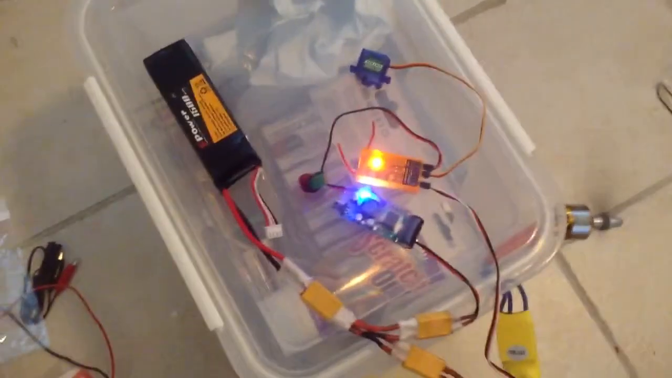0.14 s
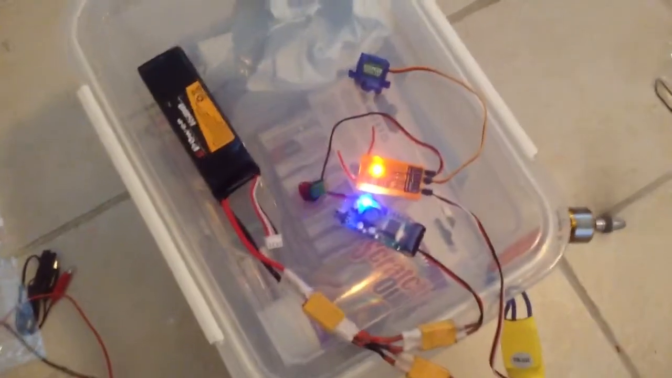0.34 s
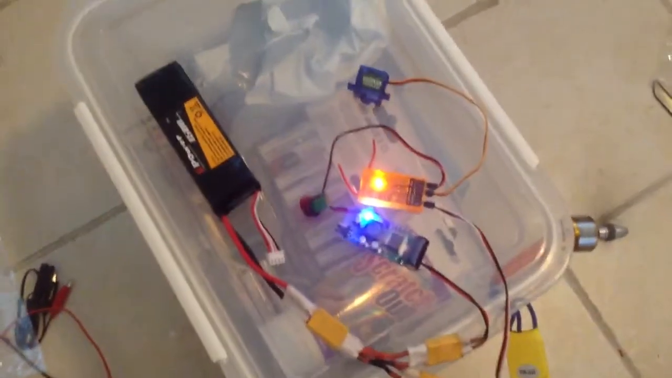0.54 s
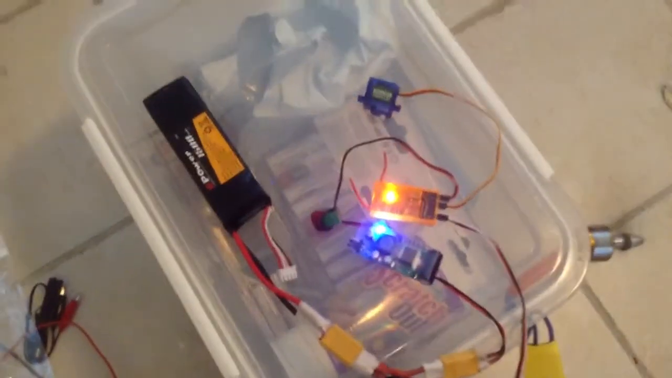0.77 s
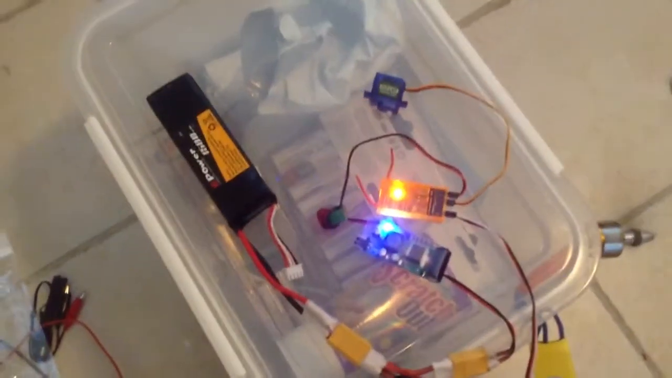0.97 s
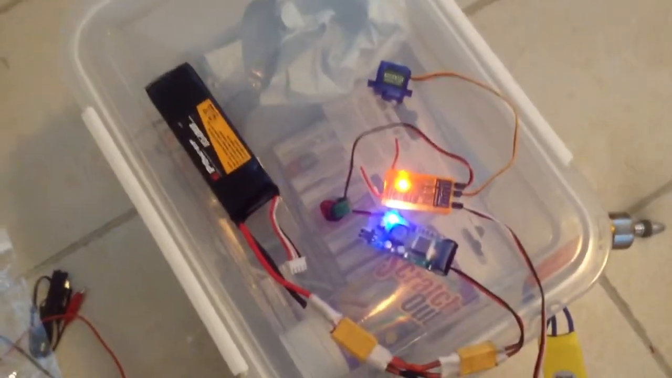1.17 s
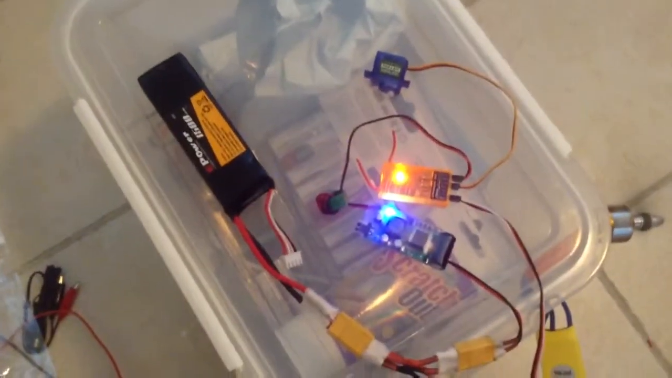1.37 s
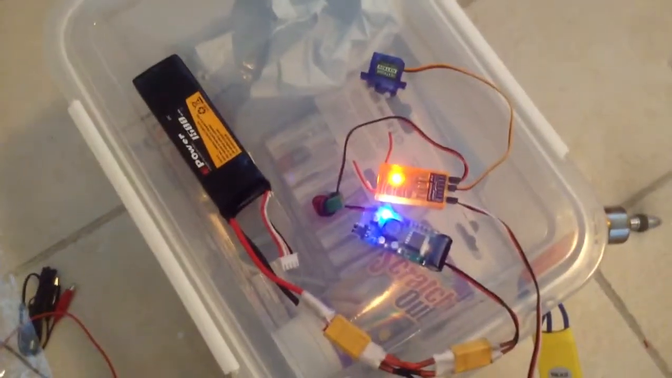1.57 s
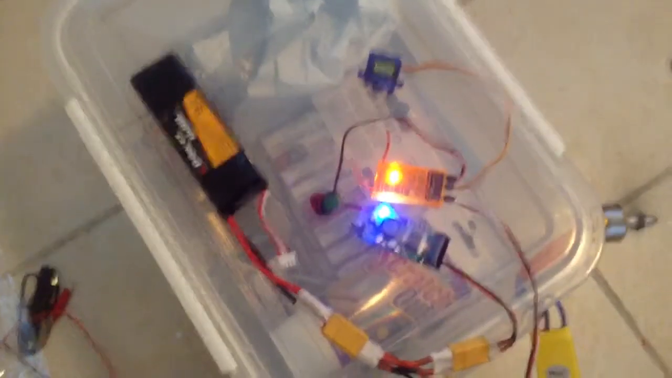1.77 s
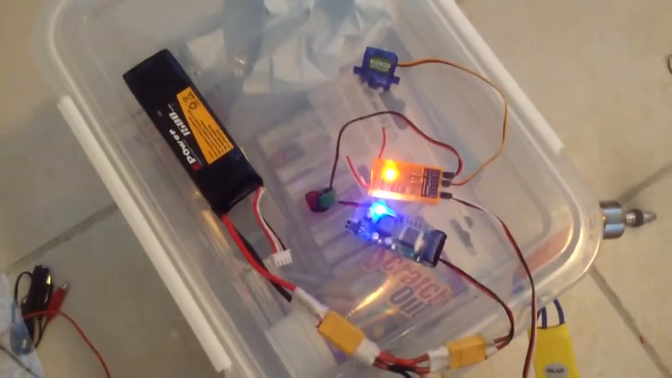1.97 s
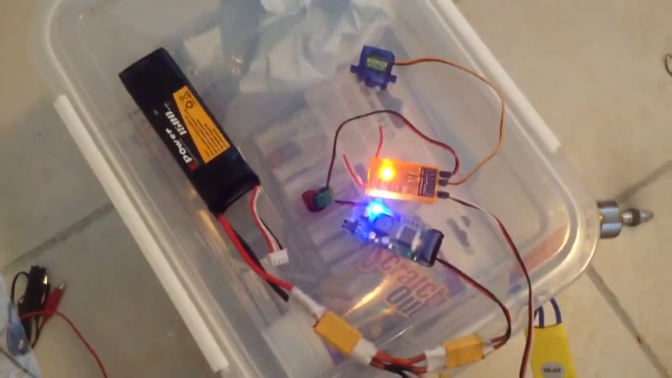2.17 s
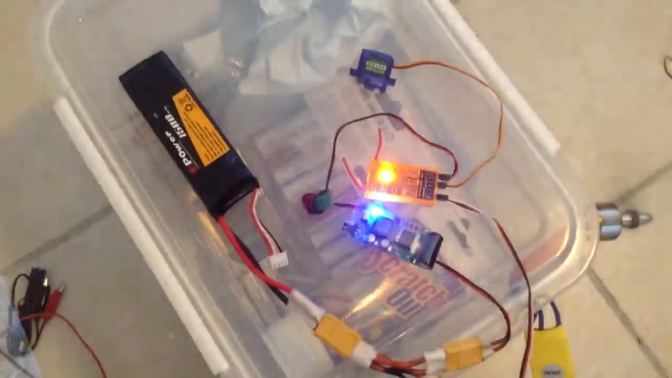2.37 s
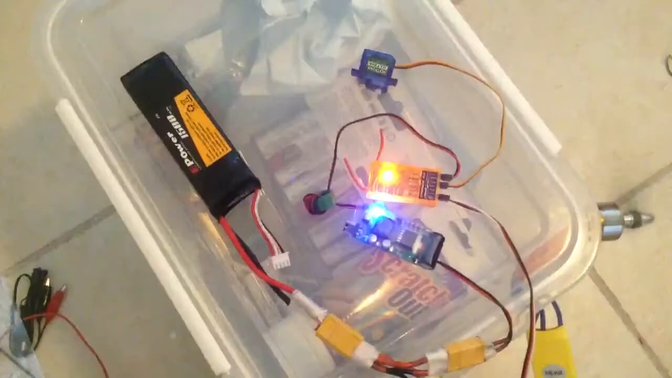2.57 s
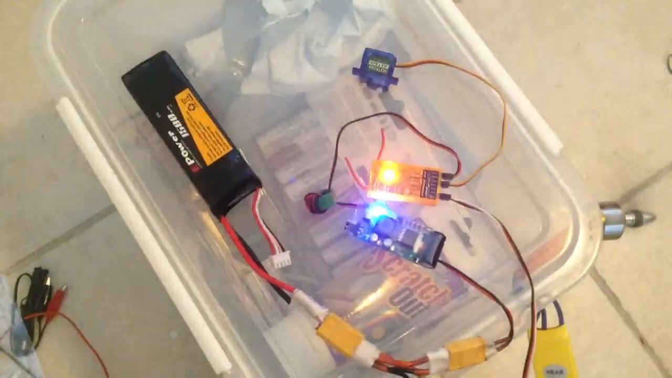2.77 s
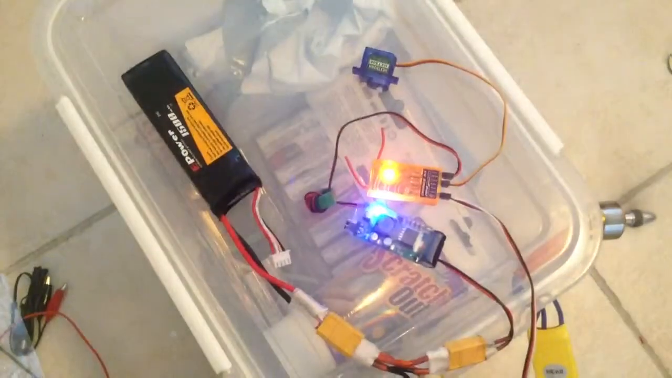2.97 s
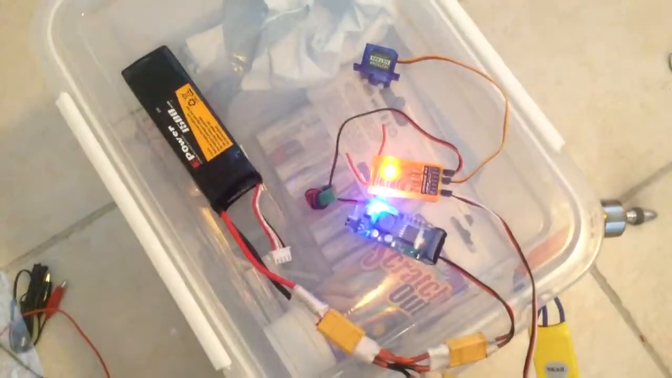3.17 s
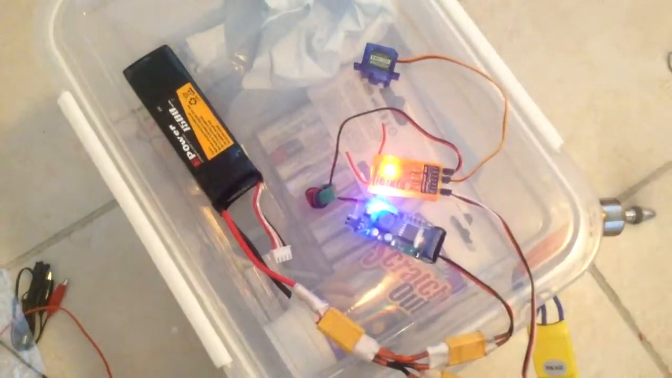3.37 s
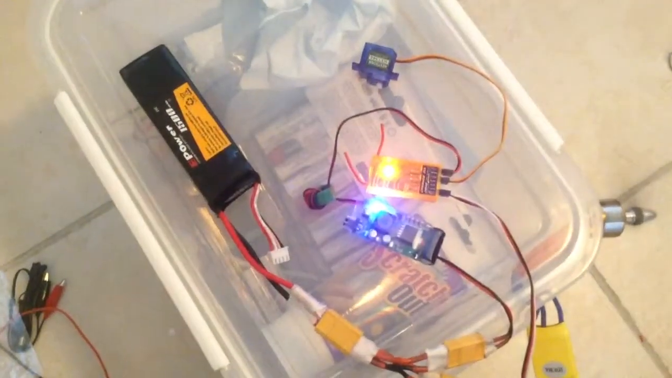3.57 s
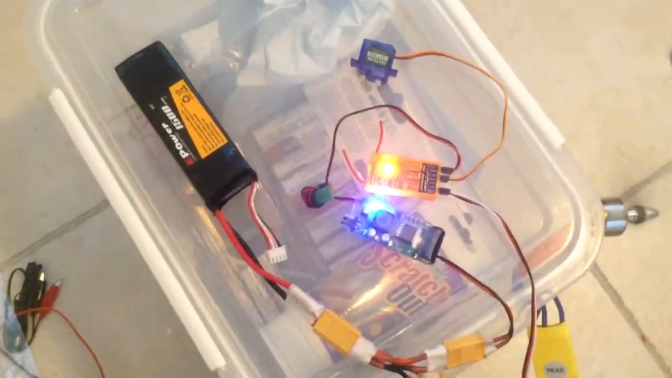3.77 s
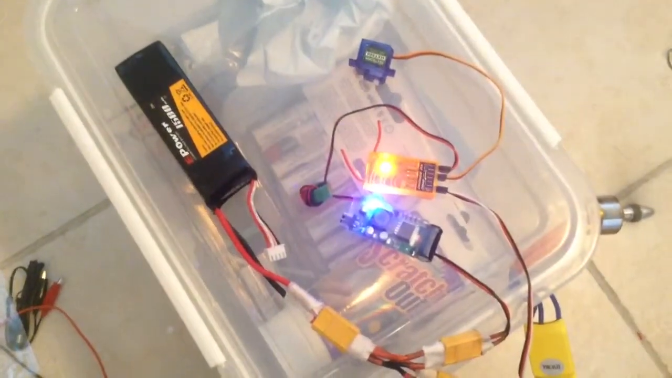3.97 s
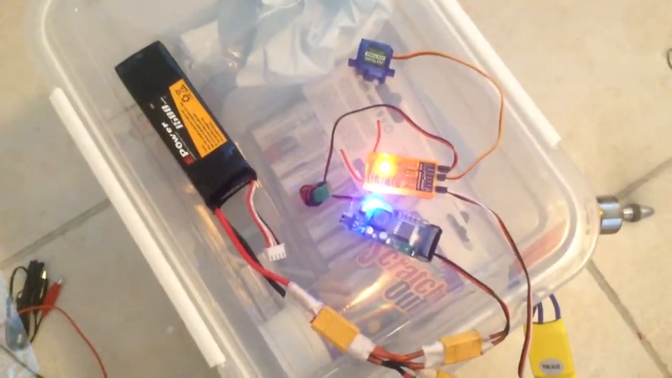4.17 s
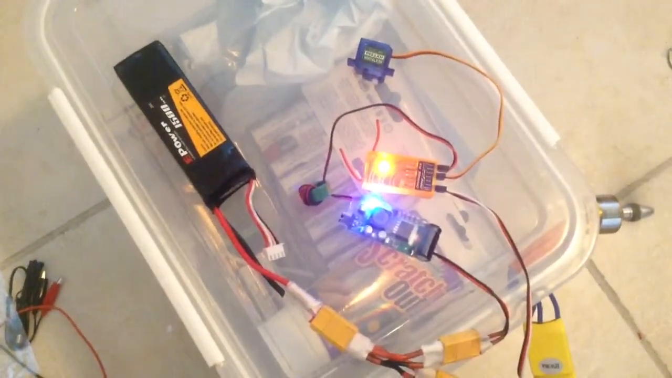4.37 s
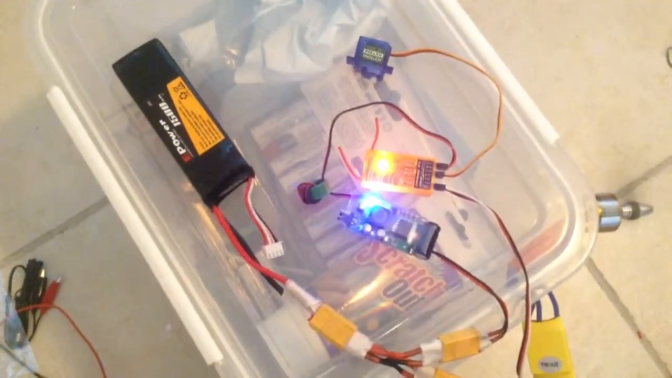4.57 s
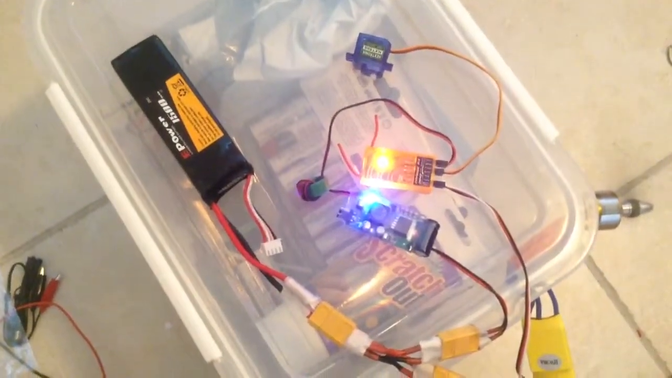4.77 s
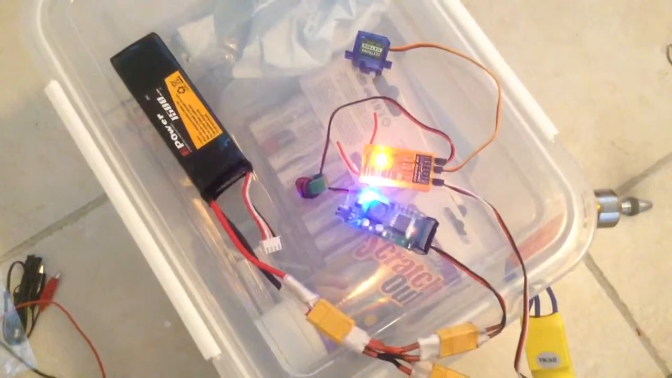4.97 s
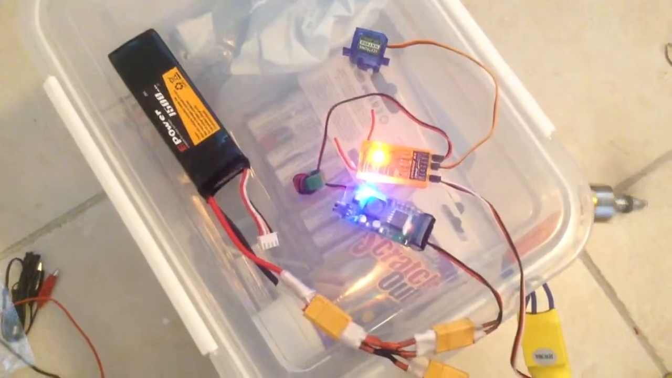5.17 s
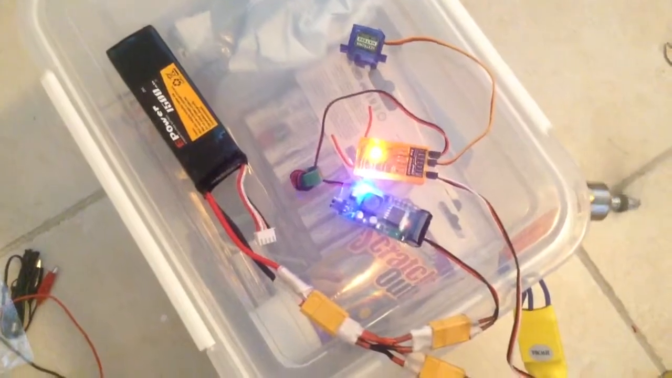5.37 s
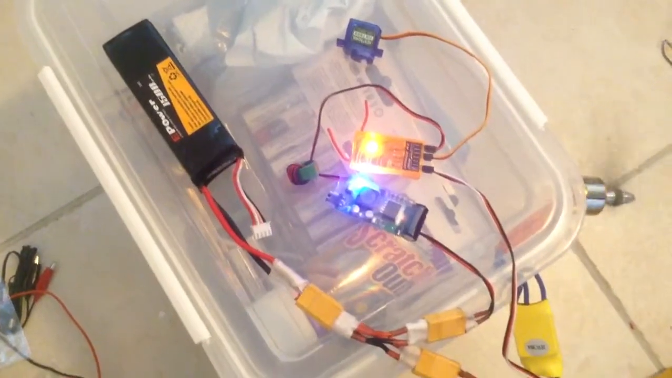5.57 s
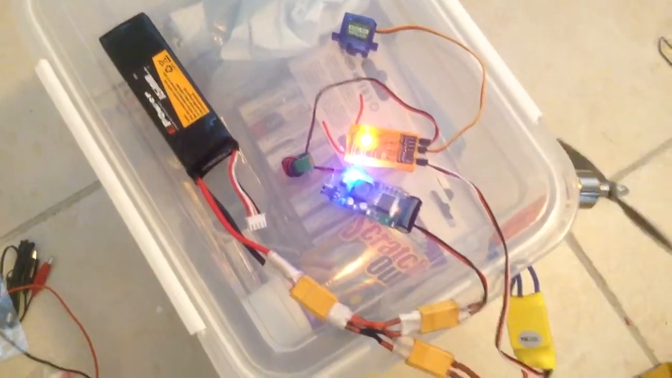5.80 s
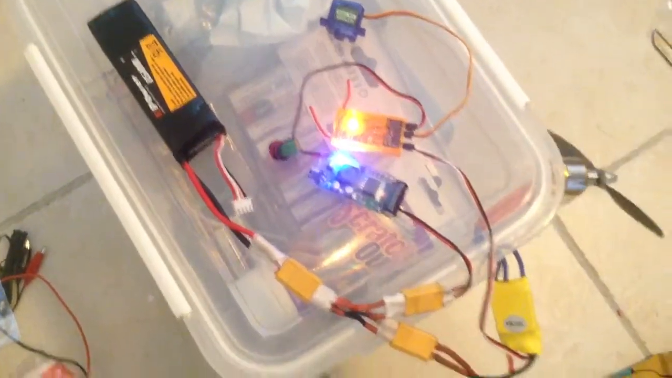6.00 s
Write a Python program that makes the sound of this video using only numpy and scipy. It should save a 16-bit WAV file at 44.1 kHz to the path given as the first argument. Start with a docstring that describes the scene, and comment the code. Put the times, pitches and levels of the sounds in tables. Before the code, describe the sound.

A small brushless motor spins a two-blade propeller close to the microphone: a piercing, slightly wavering whistle, fainter high whines, low hum and a fluttering rush of air. An early bright rasp ends at one sharp, loud knock with brief scuffs, followed by weaker taps. Near the end the power cuts, the whine vanishes and the rotor quickly slows with soft boomy shakes, leaving a quiet tiled room.

```python
"""Small propeller motor, powered and then coasting down

A small brushless motor on a plastic box spins a two-blade propeller on a tiled floor, close to a microphone.
Its drive whines and whistles (wavering sines) over a low hum and a rush of air (shaped noise that the blades chop).
An early rasp of pulsing noise dies away just after a sharp knock; there are also weaker knocks and scuffs.
Then the power is cut: the rotor coasts down, shaking the box, and a faint thin whistle rises in the quiet."""
import sys
import numpy as np
from scipy import signal
from scipy.fft import rfft, irfft
from scipy.io import wavfile
from scipy.ndimage import map_coordinates

SR = 44100
rng = np.random.default_rng(int(sys.argv[2]) if len(sys.argv) > 2 else 0)


def dump(signal):
    """Clip the signal to [-1, 1] and save it as 16-bit WAV at the path in sys.argv[1]."""
    limited = np.clip(np.atleast_2d(signal).T, -1, 1)
    pcm = np.round(limited * 32767).astype(np.int16)
    wavfile.write(sys.argv[1], SR, pcm)


N = 266344
T = np.arange(N) / SR  # time of every sample, s
HZ = np.fft.rfftfreq(N, 1 / SR)  # frequency of every bin of a full-length spectrum
SHAFT_HZ = 51.288  # turns per second at full speed
CUT_S = 5.155  # when the power is cut


def amp(db):
    """Turns decibels into a gain."""
    return 10 ** (np.asarray(db) / 20)


def unit(x):
    """Scales a signal to rms 1."""
    return x / np.sqrt(np.mean(abs(x) ** 2) + 1e-20)


def curve(rows):
    """Joins rows of (seconds, values..) by straight lines: one curve over time per value column."""
    seconds, *columns = np.transpose(rows)
    return [np.interp(T, seconds, column) for column in columns]


def read(points, hz):
    """Reads a spectrum of (Hz, value) points at any frequency, along a log-frequency axis."""
    point_hz, values = np.transpose(points)
    return np.interp(np.log(hz + 1), np.log(point_hz), values)


def noise(db):
    """Makes noise of rms 1 with the given spectrum in dB."""
    return unit(irfft(rfft(rng.standard_normal(N)) * amp(db), N))


def drift(rate_hz):
    """Makes a random wander of rms 1 that holds little movement faster than the given rate."""
    return unit(irfft(rfft(rng.standard_normal(N)) * np.exp(-(HZ / rate_hz) ** 2), N))


def tone(turns):
    """Makes a sine of rms 1 from a count of cycles, starting anywhere in its cycle."""
    return np.sqrt(2) * np.sin(2 * np.pi * (turns + rng.random()))


def lines(table, turns, waver_db, carrier=0, wander=0):
    """Adds sines at whole multiples of the shaft rate around a carrier, each wavering by itself."""
    total = 0
    for multiple, db in table:
        level = amp(db + waver_db * drift(3.4))
        cycles = carrier + round(multiple) * turns + wander * drift(5.1)
        total = total + level * tone(cycles)
    return total


def room():
    """The quiet room: steady noise, strongest in the low range."""
    # Shape of the room noise. Each row: frequency in Hz, relative level in dB.
    room_shape = [(18, -55), (30, -30), (119, -13), (185, 0.5), (281, -3), (346, -8), (511, -12),
                  (1000, -10.5), (1170, -13.5), (1690, -16.5), (2920, -16), (7830, -18), (9390, -18.5),
                  (15000, -18.5)]
    return amp(-68) * noise(read(room_shape, HZ))


def scuffs():
    """Short rubs and swishes, dull or hissy: bands of noise that swell and fade."""
    # Each row: middle in seconds, half length in seconds, centre in Hz, width in octaves, level in dB.
    rubs = [(.686, .013, 450, .7, -50), (.733, .012, 500, .9, -47), (.768, .02, 450, .9, -51),
            (.75, .012, 11000, .5, -50), (.773, .012, 11500, .45, -52), (.851, .018, 11500, .28, -55),
            (5.99, .04, 2200, .9, -75)]
    octaves = np.log2(HZ + 1)
    out = np.zeros(N)
    for middle_s, half_s, centre_hz, width, db in rubs:
        swell = np.exp(-((T - middle_s) / half_s) ** 2)
        distance = (octaves - np.log2(centre_hz)) / width
        out += amp(db) * swell * noise(-np.minimum(4 * distance ** 2, 100))
    return out


def knocks(turn_hz=170, size=4096):
    """Dead blows close to the microphone: a crack, then a short low push of opposite sign."""
    # The blows. Each row: start in seconds, peak in dB, treble tilt in dB per octave.
    blows = [(.681, -48, -4), (.7401, -4.3, 0), (.7812, -26, .8), (1.044, -53, -4), (1.275, -47, -1),
             (1.353, -47, -3), (1.378, -44, -4), (1.398, -48, -3), (1.546, -46, -4), (1.595, -45, -5)]
    # Spectrum that all blows share before their tilt. Each row: frequency in Hz, relative level in dB.
    blow_shape = [(30, -25), (85, -21), (140, -4), (215, 5), (330, 1), (620, -1.5), (1000, -8.5),
                  (1500, -16), (2200, -13.5), (3300, -23.5), (4600, -17.5), (6000, -37), (10000, -35.5),
                  (15000, -53.5)]
    hz = np.fft.fftfreq(size, 1 / SR)
    lag = (turn_hz - 1j * hz) / (turn_hz + 1j * hz)  # the bass arrives behind the crack
    out = np.zeros(N)
    for start_s, peak_db, tilt_db in blows:
        shape_db = read(blow_shape, abs(hz)) + tilt_db * np.log2(1 + abs(hz) / 250)
        log_gain = np.log(amp(shape_db))
        response = np.exp(np.conj(signal.hilbert(log_gain)))  # makes the ring follow the hit, never lead it
        blow = np.fft.ifft(lag * response).real
        out[round(start_s * SR):][:size] += amp(peak_db) * blow / abs(blow).max()
    return out


def thin_whistle():
    """A faint, nearly pure tone that rises in pitch and fades."""
    # Path of the tone. Each row: time in seconds, pitch in Hz, level in dB.
    path = [(5.55, 850, -92), (5.595, 965, -70), (5.64, 990, -79), (5.7, 1110, -79), (5.77, 1170, -72),
            (5.81, 1180, -81), (5.87, 1180, -81), (5.95, 1170, -92)]
    hz, db = curve(path)
    cycles = np.cumsum(hz) / SR + .12 * drift(45)
    sounding = (T > path[0][0]) * (T < path[-1][0])
    return amp(db + 2 * drift(25)) * tone(cycles) * sounding


def coast():
    """Share of full speed: steady until the cut, then slowed by drag (speed squared) and constant friction."""
    drag, friction = 3.75, .72  # share of full speed lost per second: to air at full speed, to friction
    balance = np.sqrt(friction / drag)  # the speed at which both brake equally
    angle = np.arctan(1 / balance) - drag * balance * np.maximum(T - CUT_S, 0)
    return balance * np.tan(np.maximum(angle, 0))


def coasting(turns, speed, box_hz=190, flutter_db=3, smear=0.18):
    """Magnetic cogging glides down unevenly while the shaken box booms in pulses at its own resonance."""
    # Jolts of the box. Each row: middle in seconds, half length in seconds, level in dB.
    jolts = [(5.19, .02, -62), (5.307, .018, -61), (5.384, 0.033, -65), (5.545, 0.042, -64),
             (5.694, 0.023, -62), (5.792, 0.034, -69.5)]
    cogs = 42  # magnetic catches per turn
    best_hz, best_db, fall_db = 770, -68, 6  # loudest pitch, its level, fall per squared octave from it
    octaves = np.log2(cogs * SHAFT_HZ * (speed + 1e-6) / best_hz)
    cogging_level = amp(best_db - fall_db * octaves ** 2 + flutter_db * drift(30))
    cogging = cogging_level * tone(cogs * turns + smear * drift(50))
    shake = sum(amp(db) * np.exp(-((T - middle_s) / half_s) ** 2) for middle_s, half_s, db in jolts)
    boom = shake * tone(box_hz * T + 0.16 * drift(35))
    return (cogging + boom) * (T > CUT_S)


def rasp(turns):
    """A bright rasp: noise that pulses twice a turn, holds until just after the sharp knock, then dies."""
    # Colour of the rasp. Each row: frequency in Hz, relative level in dB.
    rasp_shape = [(150, -54.5), (600, -17), (1200, -7), (1800, -3.5), (2200, 3), (2700, 3.5), (3350, -1),
                  (3800, 1), (4600, 2.5), (5200, 2), (5900, -18.5), (9000, -47.5)]
    hold_db, end_s, fall_db_per_s = -44, .755, 130.5
    level_db = hold_db - fall_db_per_s * np.maximum(T - end_s, 0)
    pulse = 1 + 0.16 * np.cos(4 * np.pi * turns)
    return noise(read(rasp_shape, HZ)) * amp(level_db) * pulse


def bearing(turns, size=860):
    """The same rough track passes on every turn: white noise that repeats at the shaft rate."""
    track = rng.standard_normal(size)
    return unit(map_coordinates(track, [turns % 1 * size], mode="grid-wrap"))


def air(turns, speed):
    """Turbulence chopped by two blades, with bearing roughness; as the rotor slows, the treble dies first."""
    # Broad shape of the rush. Each row: frequency in Hz, relative level in dB.
    rush_shape = [(50, -39.5), (110, -22.5), (190, -10.5), (420, -10.5), (490, -1.5), (780, -1.5),
                  (1000, -7), (1300, -3), (4000, -4), (5600, 0.5), (7000, -5.5), (9300, -7.5), (11300, -15),
                  (15300, -18)]
    # Bumps and dips that the box and floor give it. Each row: centre in Hz, width in Hz, change in dB.
    bumps = [(480, 14, 6), (516, 15, -5), (559, 13, 4), (750, 16, 3.5), (1683, 78, -3), (2090, 58, 1.5),
             (2685, 58, 5), (2940, 85, 3), (3060, 54, -0.5), (4600, 150, -0.5)]
    full_speed_db = -48.5
    colour_db = sum(db * np.exp(-.5 * ((HZ - hz) / width) ** 2) for hz, width, db in bumps)
    bearing_db = read([(300, -4.0), (700, -5.5), (2500, -10.5), (6500, -12.5), (12000, -10.5)], HZ)
    source = rfft(rng.standard_normal(N)) + amp(bearing_db) * rfft(bearing(turns))
    rush = unit(irfft(source * amp(read(rush_shape, HZ) + colour_db), N))
    chop = 1 + .09 * np.cos(4 * np.pi * turns)
    rush *= amp(full_speed_db + 0.68 * drift(14.4)) * chop

    # Each band's gain is a power of the speed, and the power grows towards the treble.
    hz, seconds, bands = signal.stft(rush, SR, nperseg=512)
    power = read([(200, 1.7), (900, 1.75), (2500, 2.3), (6000, 3.26), (12000, 4.0)], hz)
    bands *= np.interp(seconds, T, speed + 1e-6) ** power[:, None]
    return signal.istft(bands, SR, nperseg=512)[1][:N]


def hum(turns):
    """Low hum of unbalance and blade passing: wavering sines at multiples of the shaft rate."""
    # Each row: multiple of the shaft rate, level in dB.
    hum_lines = [(2, -80), (3, -79), (4, -67), (5, -81), (6, -77.5), (8, -73.5), (11, -77), (14, -74)]
    return lines(hum_lines, turns, waver_db=1.5)


def whistle(turns, gain_db=1.05, waver_db=0.54):
    """A drive tone near 5 kHz, split by the turning rotor; its upper sidebands are fuzzy, then cleaner."""
    # Pitch of the carrier. Each row: time in seconds, pitch in Hz.
    pitch_path = [(.9, 5083), (1.7, 5077), (3.9, 5078), (4.2, 5070), (4.6, 5072), (4.95, 5078)]
    # Level of the core before gain_db. Each row: time in seconds, level in dB.
    core_path = [(0.0, -52.5), (0.2, -56), (0.64, -54), (0.74, -47), (0.91, -56.5), (1.07, -54),
                 (1.8, -47.5), (2.04, -55), (3.53, -47), (5.13, -47)]
    # Core lines. Each row: distance from the carrier in shaft rates, relative level in dB.
    core_lines = [(-2, -11), (-1, -5), (0, 2.5)]
    # Upper sidebands. Each row: distance from the carrier in shaft rates, relative level in dB.
    upper_lines = [(1, -19.5), (2, 3), (3, 7), (4, -0.5), (5, 3.5), (6, -14), (7, -4)]
    upper_mean_db, follow = -52, .1  # follow: share of the core's swells that the sidebands copy
    fuzz_early, fuzz_late, settle_s = 0.49, 0.29, 1.9  # fuzzy share from 0 to 1, and the time to settle

    carrier = np.cumsum(curve(pitch_path)[0]) / SR
    core_db = curve(core_path)[0] + gain_db + waver_db * drift(7.6)
    upper_db = upper_mean_db + follow * (core_db - core_db.mean()) + waver_db * drift(7)
    fuzz = fuzz_late + (fuzz_early - fuzz_late) * np.exp(-(T / settle_s) ** 2)
    core = unit(lines(core_lines, turns, waver_db=0.0, carrier=carrier, wander=0.025))
    clean = unit(lines(upper_lines, turns, waver_db=2.5, carrier=carrier, wander=.07))
    haze = noise(-np.minimum(3 * ((HZ - 5240) / 130) ** 2, 100))  # narrow noise around 5240 Hz
    haze = unit(haze * (1 + 0.87 * np.cos(4 * np.pi * turns)))  # pulses twice a turn
    upper = np.sqrt(1 - fuzz) * clean + amp(-1.5) * np.sqrt(fuzz) * haze
    return amp(core_db) * core + amp(upper_db) * upper


def commutation(turns, strong_db=2.0, waver_db=0.94):
    """Switching of the coils: high lines, the strong ones throbbing once a turn."""
    # The three strong lines, as multiples of the shaft rate.
    strong_multiples = (140, 168, 294)
    # Their levels before strong_db, as the hand-held microphone drifts.
    # Each row: time in seconds, level in dB.
    low_path = [(0.0, -60), (0.13, -55), (0.77, -55.5), (0.83, -61), (1.06, -63), (1.3, -52), (2.3, -72.5),
                (4.83, -59), (5.13, -62)]
    mid_path = [(0.0, -53), (0.23, -53), (0.58, -68), (0.74, -50), (0.81, -55), (1.24, -62), (2.07, -54.5),
                (4.79, -58), (5.13, -56.5)]
    top_path = [(0.0, -66), (0.51, -72), (0.77, -63), (0.91, -73), (3.86, -69), (5.13, -75)]
    # The weak lines of the drive. Each row: multiple of the shaft rate, level in dB.
    weak_lines = [(119, -68), (141, -68), (152, -80), (154, -80), (156, -82.5), (161, -82.5), (167, -69),
                  (182, -67.5), (189, -77.5), (209, -79), (210, -71), (211, -76.5), (225, -81.5),
                  (251, -82.5), (252, -82), (260, -88.5), (266, -82), (280, -81), (290, -86), (296, -83)]
    strong = np.zeros(N)
    for multiple, path in zip(strong_multiples, (low_path, mid_path, top_path)):
        level_db = strong_db + curve(path)[0] + waver_db * drift(6)
        strong += amp(level_db) * tone(multiple * turns)
    throb = 1 + 0.098 * np.cos(2 * np.pi * turns)
    return strong * throb + lines(weak_lines, turns, waver_db=2.5)


def power_fade():
    """Gain of the electric tones: after the cut the direct sound goes first, then the room's ring dies."""
    direct_loss_db, direct_loss_s, ring_fall_db_per_s = 6, .02, 230
    since_cut = np.maximum(T - CUT_S, 0)
    direct_db = -direct_loss_db * np.minimum(since_cut / direct_loss_s, 1)
    return amp(direct_db - ring_fall_db_per_s * since_cut)


def scene():
    """Adds the motor to the room: air, rasp and coasting follow the rotor, electric tones keep their pitch."""
    speed = coast()
    turns = np.cumsum(SHAFT_HZ * speed) / SR + 0.00027 * drift(6)  # slows after the cut
    driven = SHAFT_HZ * T + .0003 * drift(5.4)  # stays at full speed
    background = room() + scuffs() + knocks() + thin_whistle()
    rotor = coasting(turns, speed) + rasp(turns) + air(turns, speed)
    electric = power_fade() * (hum(driven) + whistle(driven) + commutation(driven))
    return np.tile(background + rotor + electric, (2, 1))


def record(dry):
    """One microphone on both channels, with a steep treble limit."""
    edge_hz = 15350
    low_pass = signal.firwin(1023, edge_hz, window=("kaiser", 9), fs=SR)
    return signal.oaconvolve(dry, low_pass[None], "same")


dry = scene()
out = record(dry)
dump(out)
```